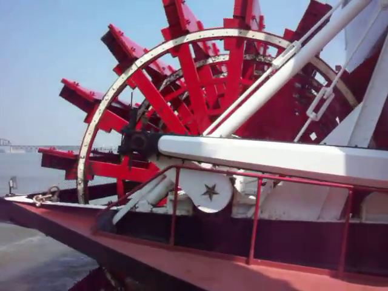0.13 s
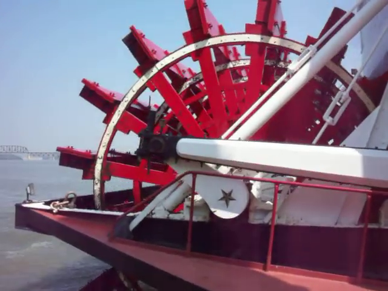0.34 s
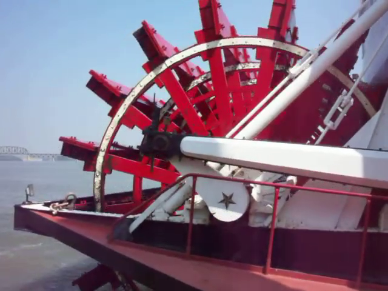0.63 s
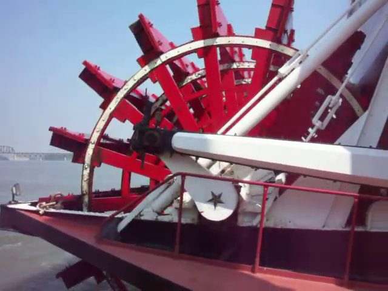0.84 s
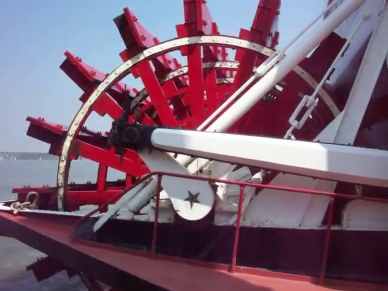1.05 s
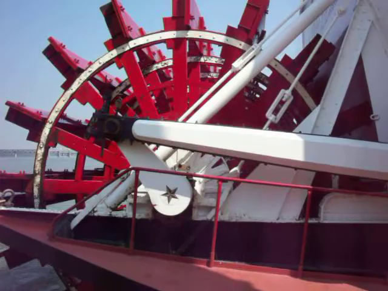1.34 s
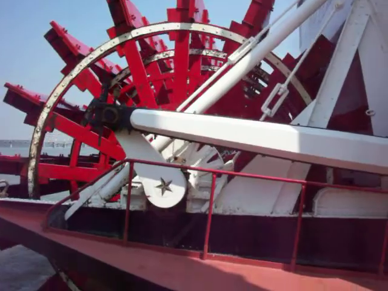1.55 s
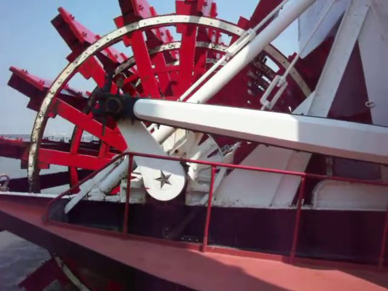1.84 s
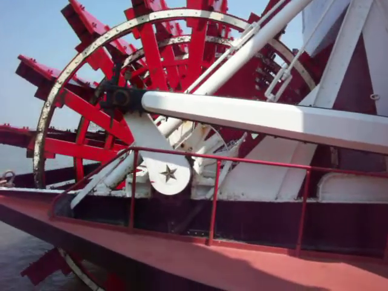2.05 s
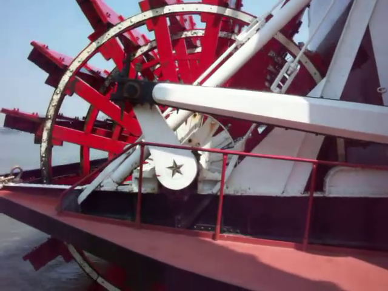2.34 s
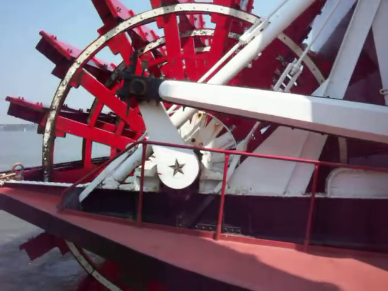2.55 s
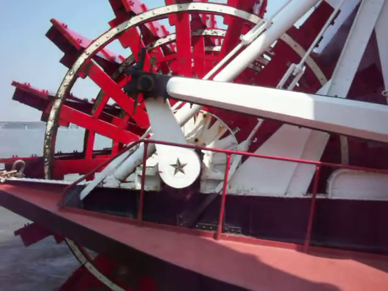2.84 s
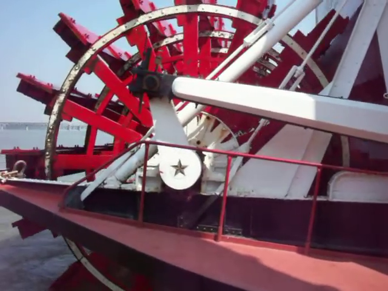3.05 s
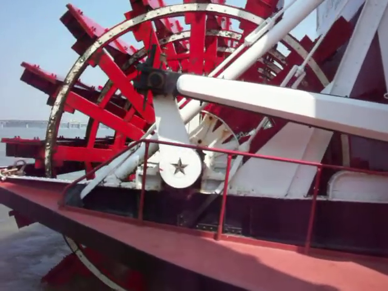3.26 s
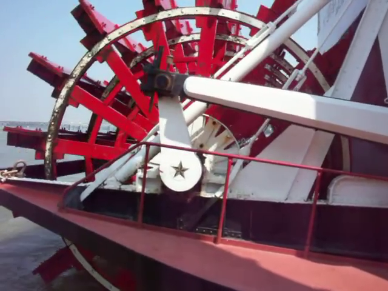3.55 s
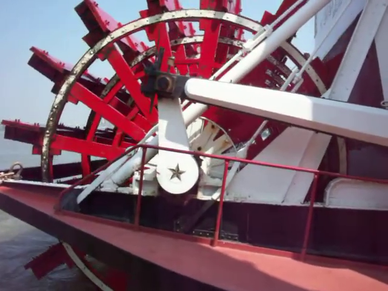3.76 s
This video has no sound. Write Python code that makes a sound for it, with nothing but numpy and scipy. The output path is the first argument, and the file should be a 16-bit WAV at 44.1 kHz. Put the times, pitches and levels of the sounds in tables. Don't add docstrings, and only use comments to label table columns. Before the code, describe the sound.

Churning paddlewheel water hisses continuously over a low wake rumble and faint drive hum

```python
import sys
import numpy as np
from scipy import signal
from scipy.fft import rfft, irfft
from scipy.io import wavfile

SR = 44100
rng = np.random.default_rng(int(sys.argv[2]) if len(sys.argv) > 2 else 0)


def amplitude_ratio(level_db):
    exponent = np.asarray(level_db, float) / 20
    return 10 ** exponent


def file_out(sig):
    cols = np.atleast_2d(sig).T
    lim = np.clip(cols, -1, 1)
    pcm = np.round(lim * 32767).astype(np.int16)
    wavfile.write(sys.argv[1], SR, pcm)


N = 172872


def rms_one(x):
    return x / np.sqrt(np.mean(x ** 2) + 1e-20)


def seconds():
    return np.arange(N) / SR


def in_time(rows):
    s, *columns = np.transpose(rows)
    return [np.interp(seconds(), s, column) for column in columns]


def at_hz(spectrum, hz):
    table_hz, level_db = np.transpose(spectrum)
    return np.interp(np.log(hz), np.log(table_hz), level_db)


def drift(rate_hz):
    r = np.exp(-80 * np.pi * rate_hz / SR)
    noise = rng.standard_normal(N // 40 + 2002)
    slow = signal.lfilter([1], [1, -2 * r, r * r], noise)[2000:]
    return np.interp(np.arange(N) / 40, np.arange(len(slow)), rms_one(slow - slow.mean()))


def resonance(x, hz, width_hz):
    r = np.exp(-np.pi * width_hz / SR)
    zeros = np.array([1, 0, -1]) * (1 - r * r) / 2
    poles = [1, -2 * r * np.cos(2 * np.pi * hz / SR), r * r]
    return signal.lfilter(zeros, poles, x)


def double_resonance(x, hz, width_hz):
    return rms_one(resonance(resonance(x, hz, width_hz), hz, width_hz))


def turbulence(spectrum, edges_hz, slow_db, fast_db, shared_db):
    source = rng.standard_normal((2, N))
    out, together = 0, drift(70.0)
    for k, (low, high) in enumerate(zip(edges_hz, edges_hz[1:])):
        sos = signal.butter(2, [low, high], "band", fs=SR, output="sos")
        band = signal.sosfilt(sos, source[k % 2])
        level_db = at_hz(spectrum, np.sqrt(low * high))
        patches_db = slow_db * drift(1.5) + fast_db * drift(45.0) + shared_db * together
        out = out + band * amplitude_ratio(level_db + patches_db)
    return rms_one(out)


def impacts(per_s, spread_db):
    size = amplitude_ratio(spread_db * np.minimum(rng.exponential(1, N), 5))
    return size * rng.choice([-1, 1], N) * (rng.random(N) < per_s / SR)


# frequency in Hz, density in dB per Hz.
SPRAY_SPECTRUM = [(500, -13.5), (1000, -7.5), (1400, -5.5), (1750, -0.5), (2600, -2), (3100, 0.5),
                  (4400, -2), (4900, -1)]


def spray():
    edges_hz = np.geomspace(400, 7000, 31)
    return amplitude_ratio(-17) * turbulence(SPRAY_SPECTRUM, edges_hz, slow_db=1.0, fast_db=0.6, shared_db=1.35)


def drops():
    runnels, level_db, ring_cycles = 70, -21.5, 130.0
    hits = impacts(per_s=10000, spread_db=1.5)
    dealt = rng.integers(0, runnels, N)
    pitches_hz = np.geomspace(900, 6200, runnels) * rng.uniform(0.99, 1.01, runnels)
    out = 0
    for k, hz in enumerate(pitches_hz):
        runnel = resonance(hits * (dealt == k) + 1e-18, hz, 2.2 * hz / ring_cycles)
        out = out + amplitude_ratio(at_hz(SPRAY_SPECTRUM, hz) + 5.5 * drift(2.2)) * runnel
    return amplitude_ratio(level_db) * rms_one(out)


# peak time in seconds, length in seconds, centre in Hz, level in dB.
SHEET_EVENTS = [(0.034, 0.33, 1772, -28.5), (0.343, 0.22, 2970, -26), (.7, 0.13, 5210, -27.5),
                (.75, 0.78, 2132, -33), (1.379, 0.31, 3780, -26.5), (1.692, 0.26, 1717, -27),
                (1.772, 0.1, 5400, -32.5), (2.127, 0.32, 3270, -28.5), (2.55, 0.25, 4100, -31.5),
                (2.926, 0.17, 2053, -22), (3.3, 0.74, 1604, -28.5), (3.64, 0.17, 3090, -31.5),
                (3.919, .3, 3970, -29.5), (3.9, 0.1, 1850, -29), (1.42, 0.15, 2330, -28),
                (1.096, .3, 1717, -31), (2.66, 0.42, 1400, -32.5), (0.487, 0.37, 1826, -31)]


def sheets():
    out = np.zeros(N)
    for peak_s, length_s, hz, level_db in SHEET_EVENTS:
        fizz = double_resonance(impacts(per_s=12000, spread_db=1.5) + 1e-18, hz, 0.11 * hz)
        swell = np.exp(-(2 * (seconds() - peak_s) / length_s) ** 2)
        out += amplitude_ratio(level_db) * swell * fizz
    return out


# frequency in Hz, density in dB per Hz.
WAKE_SPECTRUM = [(12, -37), (20, 1), (70, -1), (160, 3), (196, 2), (274, 6), (437, -1.5), (602, 3),
                 (1100, -6), (1430, -26), (2420, -120)]
# time in seconds, level in dB.
CHURN_LEVEL = [(0, -25.5), (.3, -29), (.85, -29), (1.05, -26), (1.3, -27.5), (1.55, -25.5), (1.9, -28),
               (2.25, -28.5), (2.55, -27), (3.0, -27.5), (3.3, -26.5), (3.92, -27.5)]


def wake():
    edges_hz = np.geomspace(18, 1400, 16)
    rumble = turbulence(WAKE_SPECTRUM, edges_hz, slow_db=0.5, fast_db=0.5, shared_db=0.95)
    return amplitude_ratio(in_time(CHURN_LEVEL)[0]) * rumble


# time in seconds, level in dB.
SLOSH_LEVEL = [(0, -42), (.4, -50.5), (1, -43.5), (2.4, -42), (2.85, -31.5), (3.5, -35.5), (3.92, -35)]


def slosh():
    hollow = double_resonance(rng.standard_normal(N), hz=602, width_hz=70)
    return amplitude_ratio(in_time(SLOSH_LEVEL)[0]) * hollow


# frequency in Hz, width in Hz, level in dB.
HULL_MODES = [(43.4, 7, -44), (68.1, 5.4, -40), (87.6, 9.6, -41.5), (280, 10, -47.5)]


def hull_hums():
    rise_db_per_s = 1.5
    hums = 0
    for hz, width_hz, level_db in HULL_MODES:
        hums = hums + amplitude_ratio(level_db) * rms_one(resonance(rng.standard_normal(N), hz, width_hz))
    t = seconds()
    return amplitude_ratio(rise_db_per_s * (t - t.mean())) * hums


def unsteady_tone(rows, waver):
    hz, level_db = in_time(rows)
    phase = 2 * np.pi * np.cumsum(hz * (1 + waver * drift(11.0))) / SR
    return np.sqrt(2) * amplitude_ratio(level_db + 2.5 * drift(7.6)) * np.sin(phase)


# time in seconds, pitch in Hz, level in dB.
DRIVE_LOAD = [(0, 160, -43.5), (.6, 160, -47), (.9, 160.3, -33), (1.15, 165, -38), (1.5, 161, -40),
              (2.0, 158, -37), (2.5, 163.3, -43), (3.1, 156.2, -39.5), (3.92, 160, -43.5)]


def loaded_drive():
    return unsteady_tone(DRIVE_LOAD, waver=0.016)


# time in seconds, pitch in Hz, level in dB.
BEARING_MOAN = [(.8, 247, -43), (1.05, 250, -39.5), (1.3, 255, -39.5), (1.6, 272, -39.5), (2.0, 287, -38.5),
                (2.35, 297, -41)]


def bearing_moan():
    t = seconds()
    fade_in = np.clip((t - BEARING_MOAN[0][0]) / 0.13, 0, 1)
    fade_out = np.clip((BEARING_MOAN[-1][0] - t) / 0.45, 0, 1)
    return fade_in * fade_out * unsteady_tone(BEARING_MOAN, waver=0.014)


def scene():
    water = spray() + drops() + sheets() + wake() + slosh()
    machinery = hull_hums() + loaded_drive() + bearing_moan()
    return (water + machinery)[None]


def gain_control(x):
    rate_hz, share = 10.0, 0.8
    r = np.exp(-2 * np.pi * rate_hz / SR)
    mean = np.mean(x ** 2)
    power = mean + signal.lfilter([1 - r], [1, -r], x ** 2 - mean)
    return x * (power / mean) ** (-share / 2)


# frequency in Hz, gain in dB.
BAND_EDGE = [(5000, 0), (5300, -5), (5600, -10.5), (6000, -23), (6150, -32), (6320, -48), (6500, -90)]


def narrow_band(x):
    bins_hz = np.arange(1, N // 2 + 2) * SR / N
    return irfft(rfft(x) * amplitude_ratio(at_hz(BAND_EDGE, bins_hz)), N)


def tick():
    start_s, level_db, decay_hz = 1.0982, -10, 800
    since_s = seconds() - start_s
    return -amplitude_ratio(level_db) * (since_s >= 0) * np.exp(-2 * np.pi * decay_hz * np.abs(since_s))


def top_cut(x):
    return signal.sosfilt(signal.butter(12, 15800, fs=SR, output="sos"), x)


def record(dry):
    mix = narrow_band(gain_control(dry)) + tick()
    return top_cut(mix)


dry = scene()
out = record(dry)
file_out(out)
```